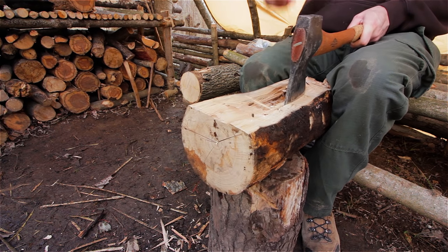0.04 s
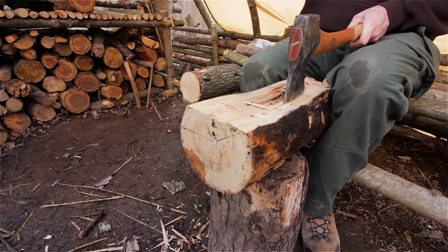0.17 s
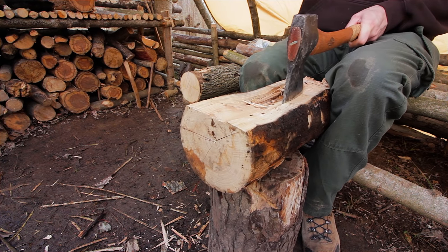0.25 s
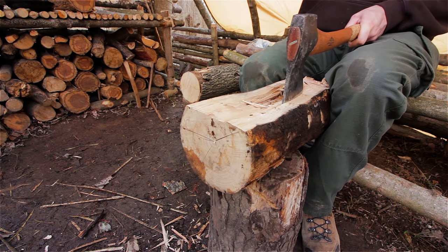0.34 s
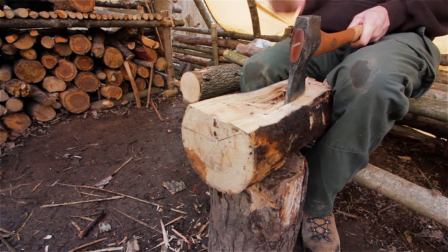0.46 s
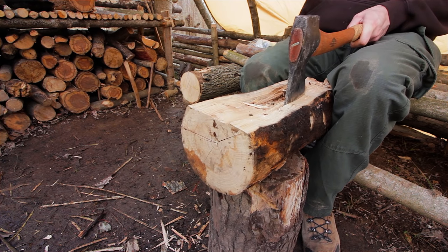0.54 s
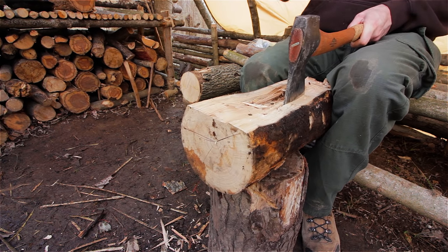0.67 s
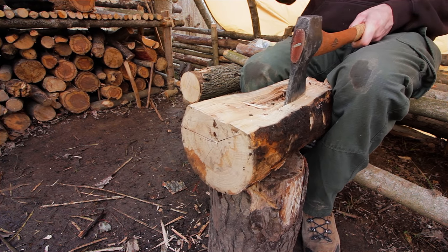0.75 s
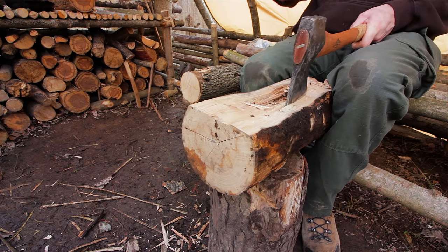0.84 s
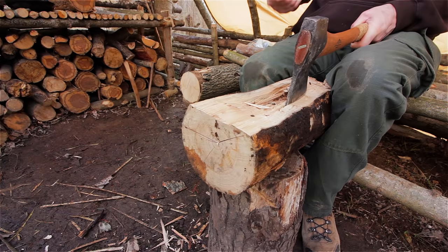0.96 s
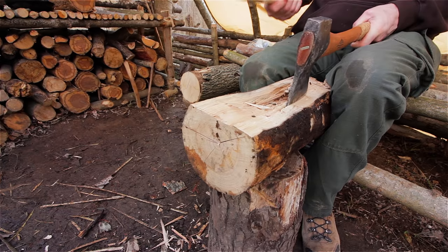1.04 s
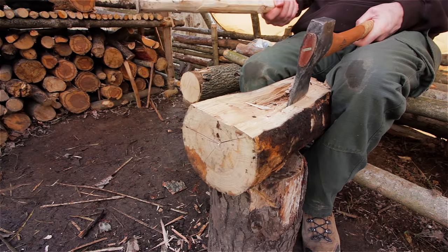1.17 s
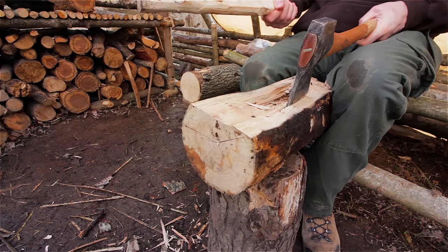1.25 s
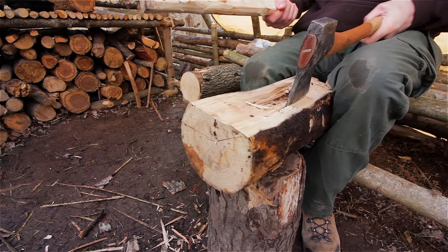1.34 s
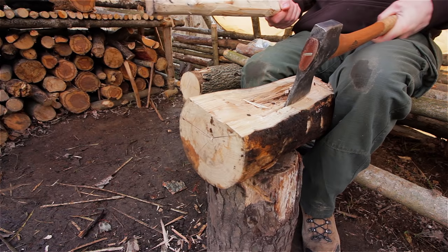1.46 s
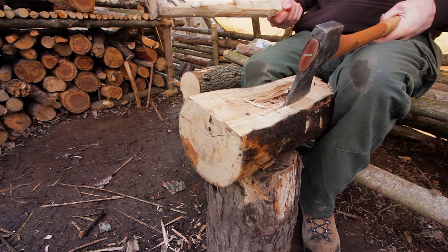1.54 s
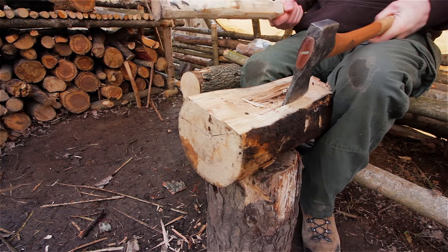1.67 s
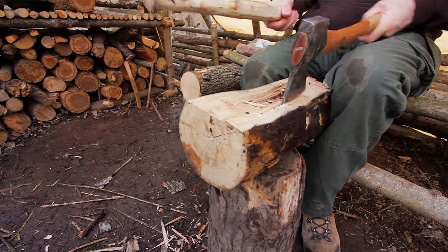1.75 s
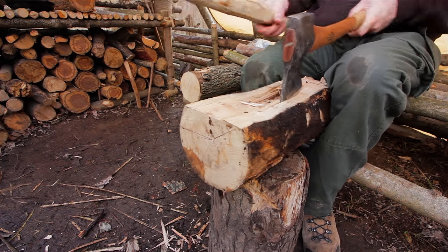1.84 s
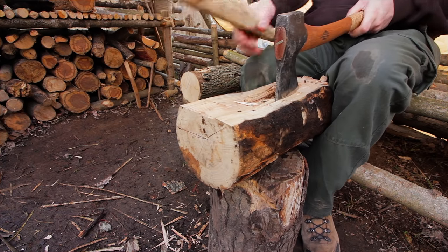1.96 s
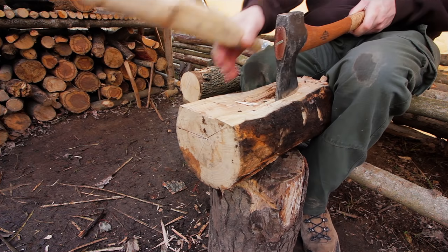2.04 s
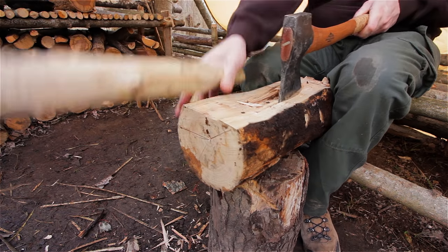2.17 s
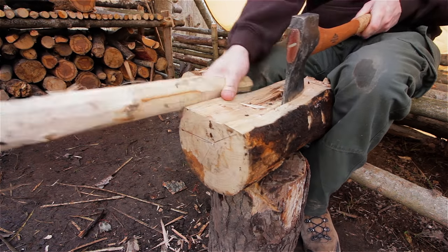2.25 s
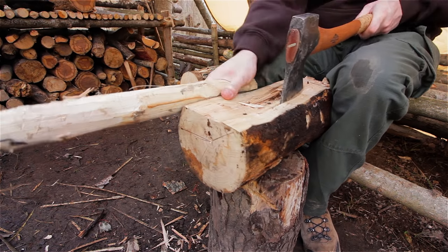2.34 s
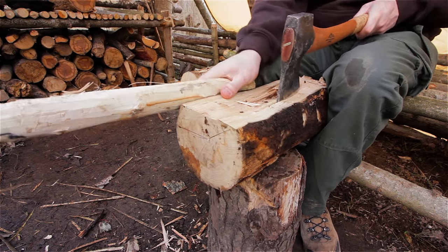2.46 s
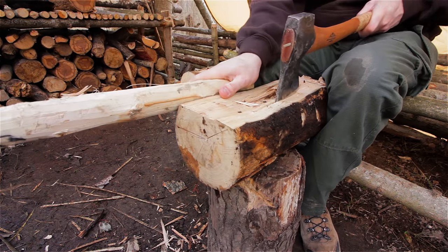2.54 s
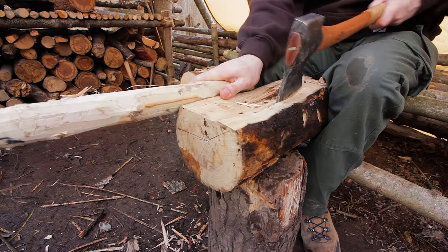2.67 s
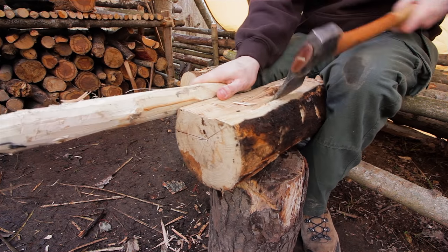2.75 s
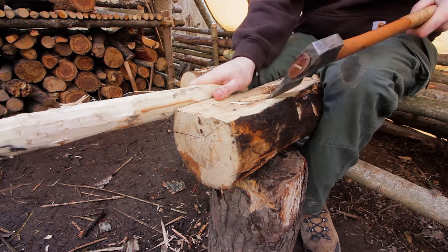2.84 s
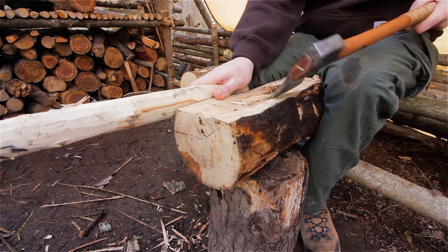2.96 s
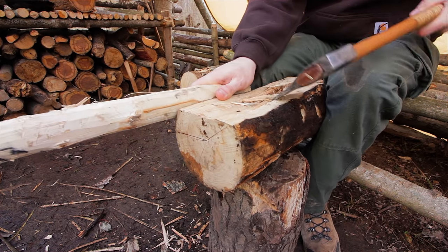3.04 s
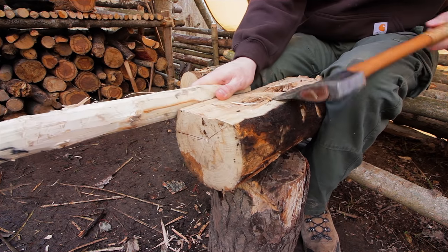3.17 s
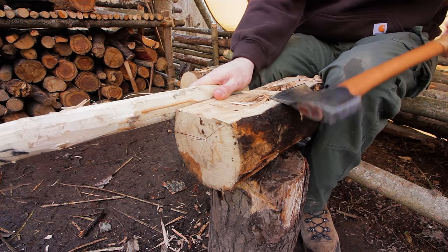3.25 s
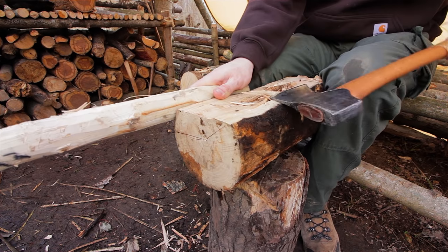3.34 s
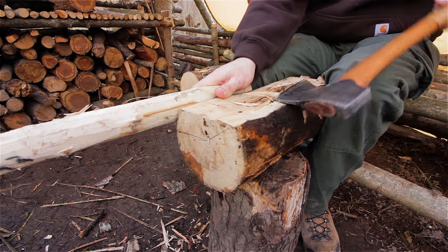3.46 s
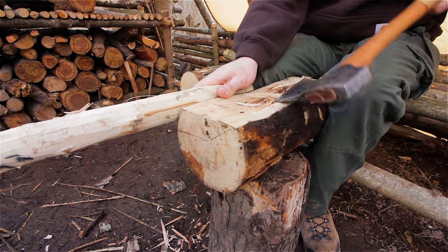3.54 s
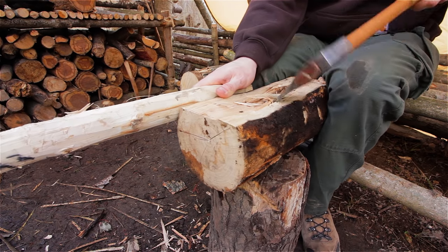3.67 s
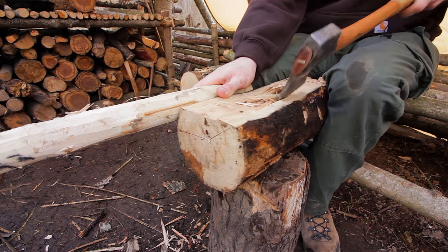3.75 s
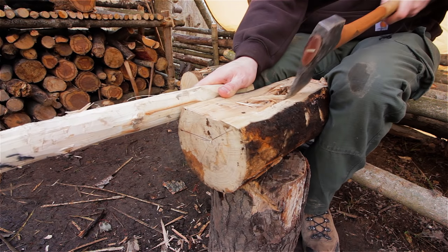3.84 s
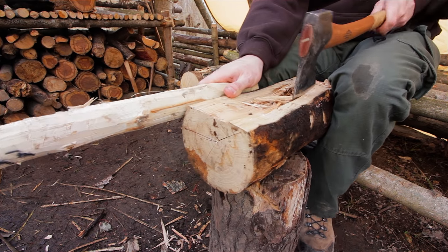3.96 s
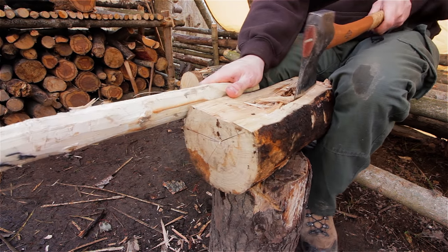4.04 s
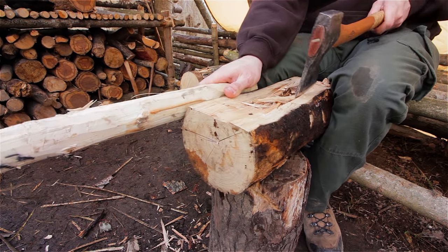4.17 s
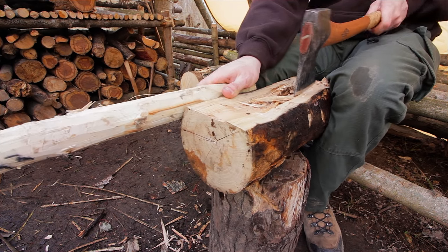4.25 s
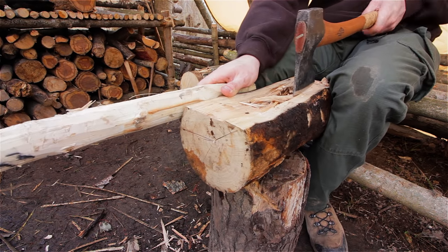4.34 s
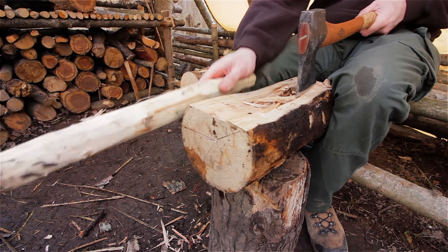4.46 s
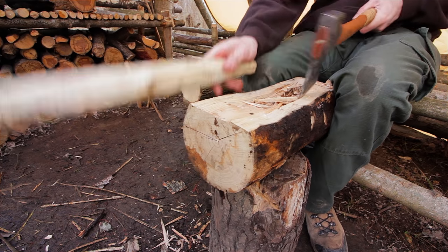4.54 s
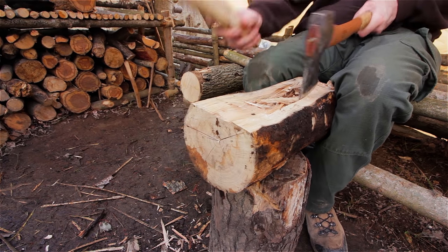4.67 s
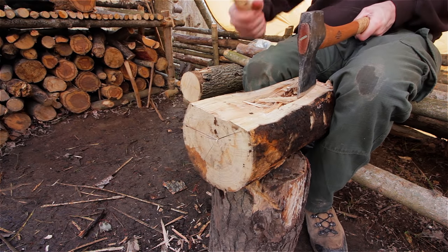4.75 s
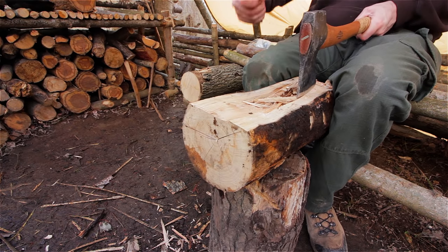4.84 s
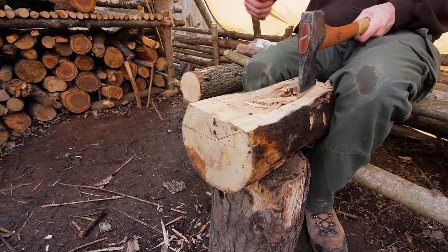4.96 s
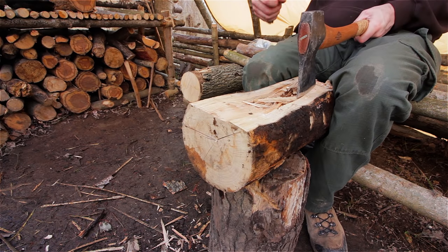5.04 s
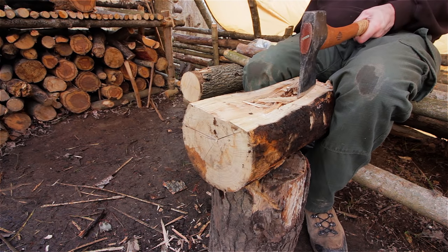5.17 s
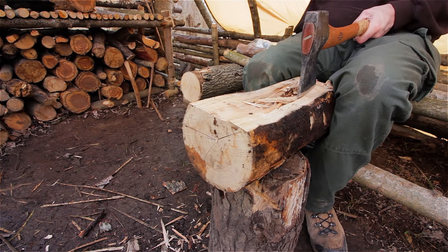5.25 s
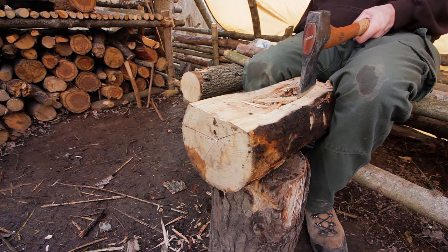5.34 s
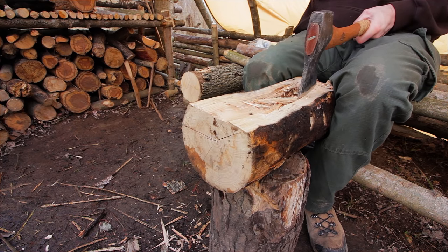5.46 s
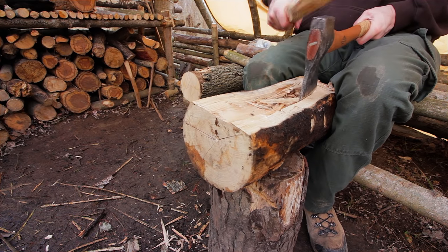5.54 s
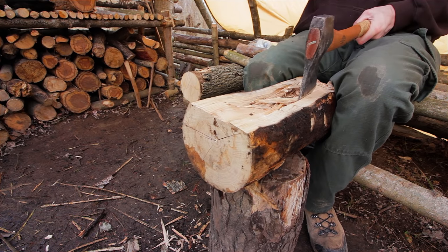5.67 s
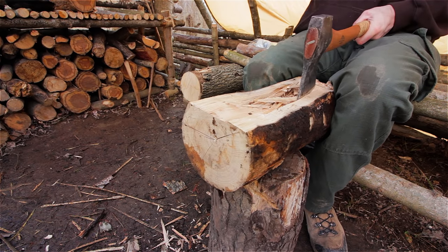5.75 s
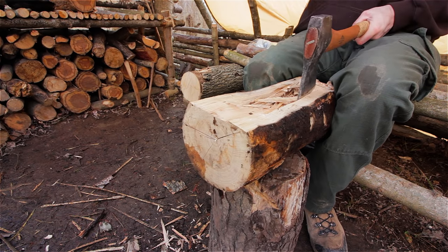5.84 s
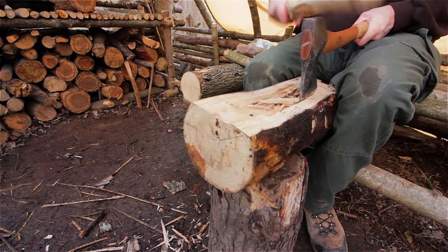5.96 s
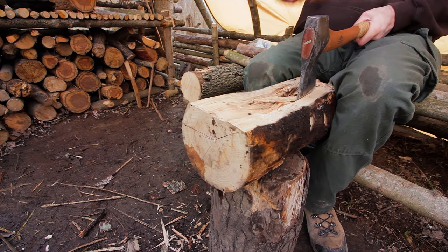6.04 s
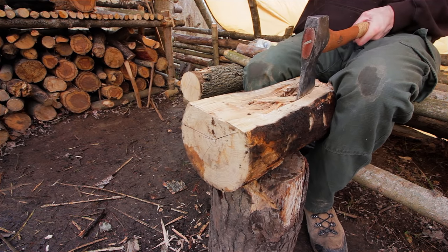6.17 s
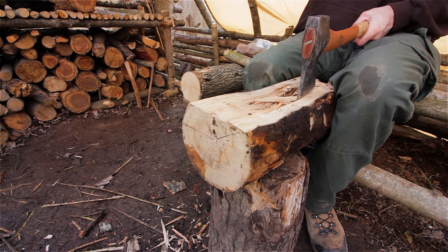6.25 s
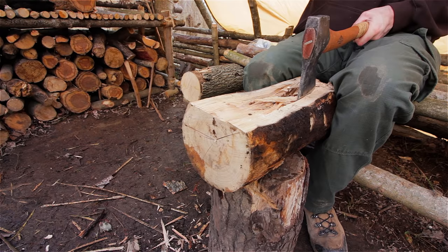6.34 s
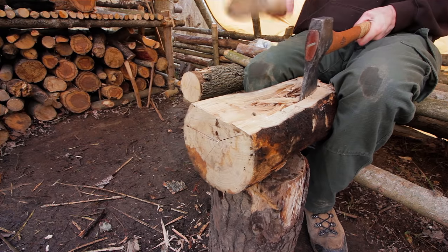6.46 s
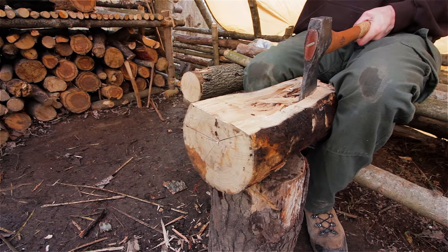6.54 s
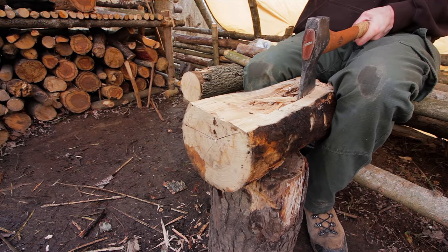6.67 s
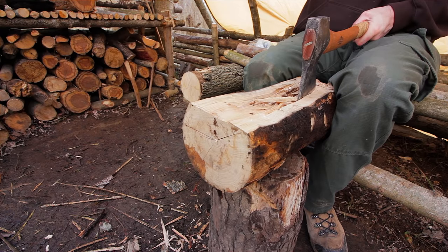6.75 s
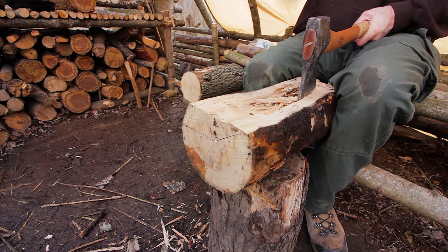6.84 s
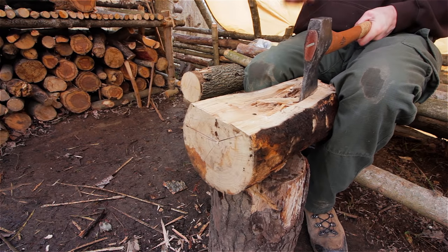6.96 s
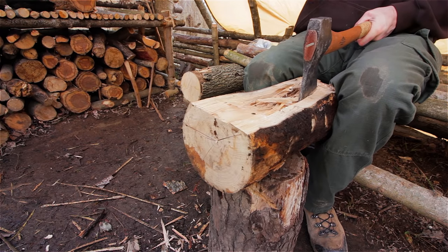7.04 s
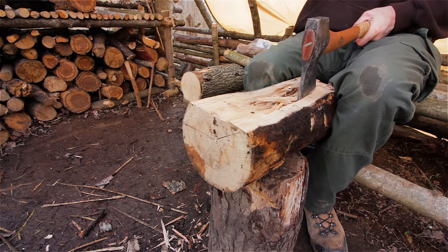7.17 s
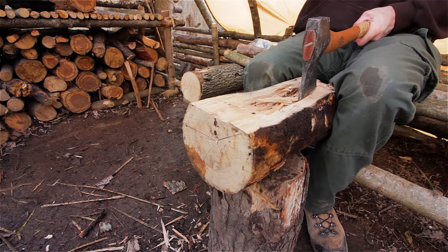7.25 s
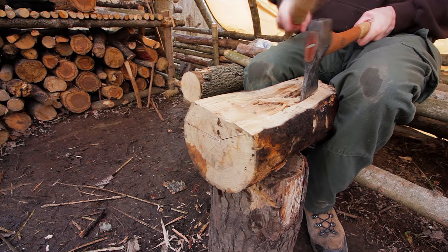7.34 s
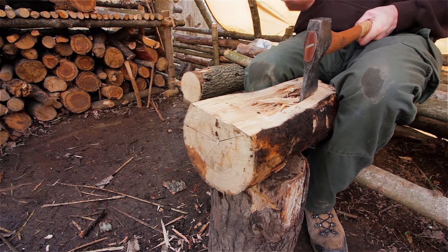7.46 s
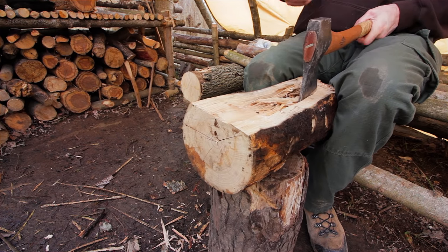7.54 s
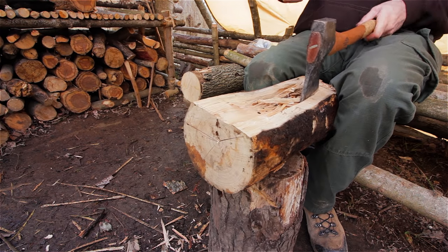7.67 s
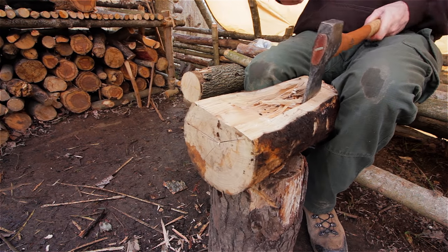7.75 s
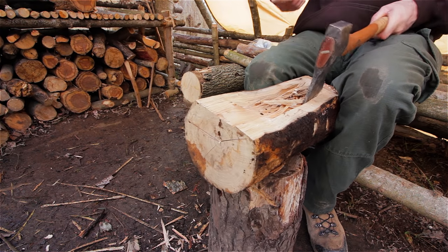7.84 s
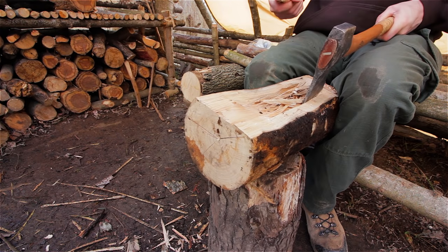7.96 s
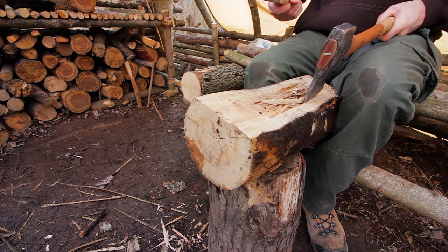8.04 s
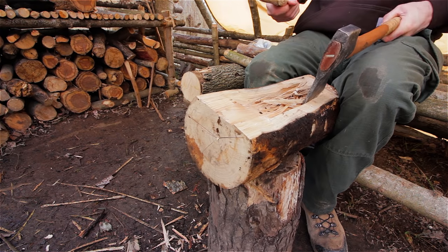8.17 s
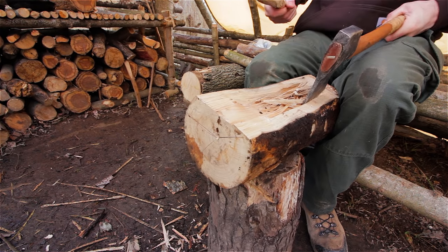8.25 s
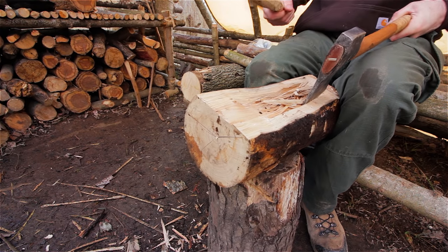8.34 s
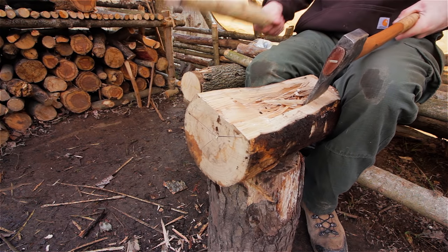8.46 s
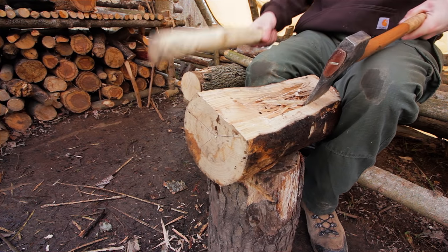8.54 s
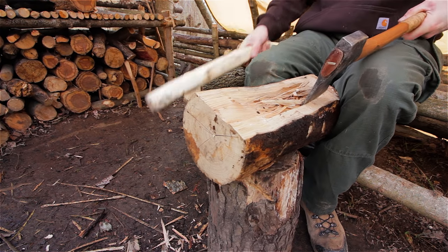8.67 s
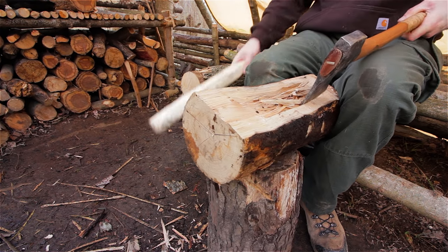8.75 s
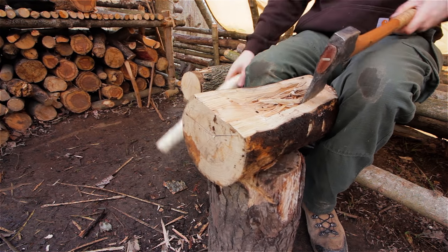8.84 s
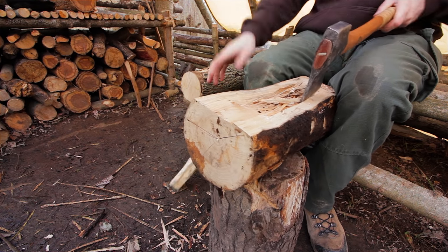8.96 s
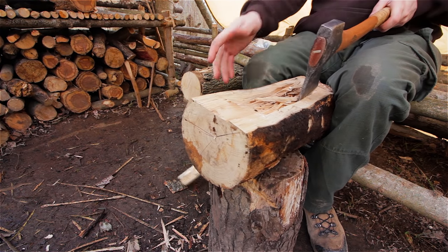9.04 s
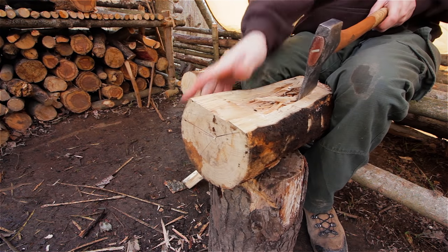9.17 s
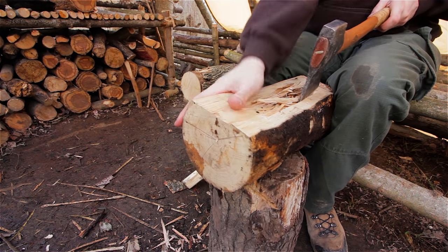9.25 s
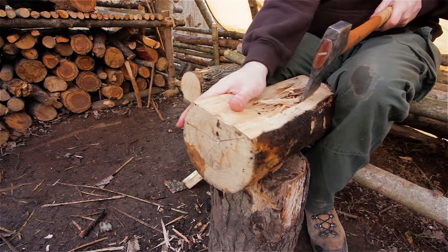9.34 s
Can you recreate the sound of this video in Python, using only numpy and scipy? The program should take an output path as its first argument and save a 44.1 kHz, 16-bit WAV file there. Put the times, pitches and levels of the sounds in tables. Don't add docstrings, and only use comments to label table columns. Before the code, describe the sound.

A wooden club hammers an axe head into a log with hard ringing knocks echoing among trees, between splinter cracks, rustling cloth and a dropped club.

```python
import sys
import numpy as np
from scipy import signal
from scipy.io import wavfile

SR = 44100
rng = np.random.default_rng(int(sys.argv[2]) if len(sys.argv) > 2 else 0)


def ratio(d):
    e = np.asarray(d, float) / 20
    return 10 ** e


def digitize_waveform(pressure):
    field = np.atleast_2d(pressure).T
    bounded = np.clip(field, -1, 1)
    quanta = np.round(bounded * 32767).astype(np.int16)
    wavfile.write(sys.argv[1], SR, quanta)


N = 414540
TIME_S = np.arange(N) / SR

# t/s, peak level/dB, crack level/dB, tilt/(dB per octave), decay factor
BLOWS = [
    (0.0505, -8.5, -6, 1.74, 1.1),
    (0.472, -10, -5.5, -.5, 1.2),
    (5.605, -8, 5.5, 0.7, 0.74),
    (6.0401, -7.5, 0.5, -1, 1.1),
    (6.4744, -7.5, 2, -1.3, 1.02),
    (6.9509, -3.5, -5, -0.5, 1.1),
    (7.4056, -6.5, 0, -0.14, 1.1),
]
# f/Hz, t60/s
CRACK_COLOUR = [(20, -39.5), (60, -38), (130, -28), (230, -15), (384, -9.5), (560, -3), (866, -10.5),
                (1200, -12.5), (1960, -8), (2480, -11), (3400, -7), (4200, -25), (6500, -20), (16000, -46)]
CRACK_T60 = [(40, .06), (150, 0.2), (400, 0.038), (1040, 0.13), (2760, 0.055), (7280, 0.027),
             (15000, 0.041)]
# f/Hz, width/Hz, level/dB
FIRST_CUT = [
    [(576, 17, -2.5), (800, 31, -10.5), (1048, 16, 0), (1115, 23, -3), (1240, 12, -4.5), (1290, 21, -8.5),
     (1534.5, 34, -4), (1943, 90, 3), (2174, 29, -0.5), (3000, 50, -16.5), (3150, 31, -22),
     (3350, 110, -13)],
    [(414, 61, -4.5), (555, 24, 2), (795, 36, -7), (1180, 30, -5), (1027, 25, 0), (1340, 21, -0.5),
     (1360, 16, -7), (1604, 76, 1.5), (2070, 19, -4.5), (2080, 36, -5), (2780, 44, -14.5),
     (3100, 39, -16.5), (3140, 20, -16), (3340, 61, -7.5)],
]
SECOND_CUT = [
    [(417, 24, -2.5), (270, 33, 0.5), (681, 30, -4), (780, 30, 1.5), (1190, 26, -4.5), (1350, 23, -6.5),
     (1610, 82, 1.5), (1950, 16, -5.5), (2080, 160, 1), (2300, 37, -0.5), (2490, 33, -6), (2800, 120, -8),
     (3050, 26, -7.5), (3270, 33, -7.5)],
    [(390, 49, -1), (570, 7.9, -0.5), (625, 20, -5.5), (806, 19, -2.5), (1090, 20, -4.5), (1184, 23, -2),
     (1285, 11, -4.5), (1580, 11, -5.5), (2100, 30, -4.5), (2300, 24, -5.5), (3100, 31, -13),
     (3420, 21, -8.5)],
    [(557, 21, 0.5), (784, 17, -3), (1005, 14, -3.5), (1195, 21, -0.5), (1600, 85, 0.5), (1905, 30, -5.5),
     (1320, 31, -6), (2140, 16, -9.5), (2350, 40, -14), (625, 43, -8.5), (2700, 41, -13), (3100, 120, -9.5),
     (3360, 29, -9.5)],
    [(426, 27, -4.5), (572, 38, 3), (1000, 26, -10), (1206, 68, -1.5), (1500, 26, -5.5), (1790, 25, -16.5),
     (2000, 86, -10), (640.7, 37, -3.5), (2600, 18, -15.5), (3200, 98, -18), (3130, 36, -14),
     (3640, 26, -21)],
    [(570, 46, -1.5), (638, 36, -7), (1090, 28, -3), (1027, 36, -2.5), (1276, 20, -6.5), (1640, 34, -3.5),
     (1664, 65, -4.5), (1920, 29, 2), (2330, 23, -11.5), (2720, 42, -14), (3150, 22, -16), (3290, 58, -11),
     (3660, 39, -15.5)],
]
BLOCK_DB = [-12, -10, -4, -9, -3, -12, -6.5]
STEEL_DB = [-56, -56, -54, -44, -52, -52, -52]
# f/Hz, level/(dB per Hz)
ECHO_COLOUR = [(150, -54), (300, -22), (540, -3.5), (900, -7.5), (1030, -2), (1500, -6.5), (1930, -3),
               (2500, -6.5), (3400, -5), (4200, -26), (8000, -46.5), (16000, -87.5)]
# f/Hz, t60/s
TREES_T60 = [(300, 1.1), (1000, 3.9), (2000, 30), (4000, 0.89), (8000, .5)]
SHELTER_T60 = [(200, 0.33), (1000, 1), (3000, 0.17), (5500, 0.18), (9000, .25)]
# level/dB, tilt/(dB per octave)
ROLL = [(0.5, -1.5), (-2, -1), (0, 2.8), (0, -1), (-0.5, 1.6), (2.5, -2), (0.5, 1)]
# f/Hz, level/dB, t60/s
LASTING = [(1124, -30.5, 0.05), (2140, -32, 0.029), (1950, -33, 0.014), (3550, -36, 0.026)]
# f/Hz, level/(dB per Hz); then f/Hz, t60/s
FIZZ_COLOUR = [(2500, -30), (4500, 0), (6500, -2.5), (10000, -12.5), (16000, -26)]
FIZZ_T60 = [(4000, 0.12), (7000, .12), (14000, .06)]

# t/s, peak level/dB, tilt/(dB per octave), decay factor
SNAPS = [(1.3004, -46, 0.5, 1.3), (1.8871, -34, 2, 0.86), (1.9046, -34.5, -0.5, 0.86),
         (2.2735, -36.5, 4, 1), (2.4239, -30.5, -3, 2.2), (2.445, -40.5, -1, .9), (2.7078, -18, -1.5, 1.5),
         (3.0704, -49.5, -5, 1.9), (3.0989, -47, -6.5, 1.9), (3.1254, -47, 4.5, 1.24),
         (3.2136, -34.5, 6, 1.6), (3.2274, -35.5, 0, 1.9), (3.2458, -31, 4.5, 0.547), (3.253, -11, 3, 1.19),
         (3.264, -1.5, 5, 3), (3.3296, -30, 2.5, 1.6), (3.3557, -16, 3.5, 1.02), (3.687, -32.5, -0.5, 0.85),
         (3.7449, -38.5, 0, 1.1), (3.9953, -26, -3.5, 1.1), (4.2667, -38, -2, 0.58), (4.356, -46, -7.5, 3),
         (4.5695, -39, -3.5, 1.4), (5.5257, -36.5, -5.5, 0.59), (5.648, -37, -6.5, 1),
         (5.9549, -33, -4.5, 0.46), (8.0354, -52, -4, 1.3), (8.0914, -49, -2.5, 0.48),
         (8.4644, -43, -8.5, 1.3)]
TEAR = [(2.745, -34.5, -4, 1.2), (2.7640, -21.5, -0.5, 1.4), (2.776, -20.5, 2.5, 0.94),
        (2.7900, -15, 1.4, 1.1), (2.7930, 7, 1.5, 1.6), (2.802, -.5, 0, 0.73), (2.8061, -8, 3, 0.97),
        (2.8104, -14.5, 0, 1.6), (2.8141, -8, -1.96, 0.89), (2.8310, -18, 0.5, 0.9), (2.8337, -14, 2, 0.65),
        (2.8385, -20.5, 0, 0.91), (2.844, -1.5, 3, 0.98), (2.891, -47, 1.5, 0.72),
        (2.9000, -44, -0.5, 0.71)]
# f/Hz, level/(dB per Hz)
SNAP_COLOUR = [(59, -44), (100, -29.5), (891, -18), (1720, -17), (3400, -1.5), (4770, -8.5), (6420, -1.5),
               (8110, -8), (9610, -7.5), (12100, -12.5), (16000, -25)]
# f/Hz, t60/s
SNAP_T60 = [(300, 0.021), (3000, 0.0023), (12000, 0.0025)]
SNAP_TAIL_T60 = [(300, 0.19), (3000, 0.025), (12000, 0.0089)]
# t/s, level/dB
CRACKLE = [(2.76, -49), (2.764, -38.5), (2.79, -42.5), (2.8, -29), (2.82, -32.5), (2.84, -37.5),
           (2.862, -37), (2.875, -66)]
# t/s, peak level/dB, f/Hz, t60/s
TWANGS = [(2.708, -26.5, 2700, 0.02), (2.708, -23.5, 3840, 0.019), (2.708, -23.5, 7200, 0.022),
          (2.764, -37, 3820, 0.033), (2.7746, -30.5, 7040, .015), (2.792, -9, 3740, 0.047),
          (2.793, -10.5, 6370, 0.017), (2.802, -13, 3300, 0.026), (2.811, -23, 3840, 0.021),
          (2.8131, -18, 3254, 0.031), (2.818, -26.5, 2900, .03), (2.834, -25.5, 3950, 0.02),
          (2.844, -16, 6844, 0.014), (3.253, -18.5, 3650, 0.023), (3.264, -18.5, 2450, 0.03),
          (3.265, -12.5, 6050, 0.017), (3.3296, -32.5, 4250, 0.015), (3.355, -28.5, 5600, 0.011),
          (3.745, -33.5, 3540, 0.011), (4.064, -40, 3000, .006), (4.065, -41, 6000, 0.0054),
          (4.788, -47, 1000, 0.054), (2.289, -15, 955, 0.037), (2.288, -12, 556, 0.035),
          (2.288, -22, 338, 0.053), (2.288, -30, 1930, 0.053), (2.289, -36, 2520, 0.037),
          (3.998, -31, 1400, 0.0093), (3.996, -28, 2200, 0.0063), (9.0541, -9.5, 1490, 0.023),
          (9.0544, -16.5, 1000, 0.026), (9.0554, -14.5, 1790, 0.027), (9.0554, -27, 630, 0.03),
          (9.0558, -19.5, 3130, 0.029), (9.058, -26, 58.5, 0.18), (9.0544, -20, 2510, 0.031),
          (3.995, -27, 5360, 0.011), (4.168, -37, 4500, .008), (4.28, -38, 3800, .008),
          (4.4305, -37, 5300, .008), (4.357, -42, 4000, .02), (4.103, -44, 4000, .006),
          (3.699, -45, 8500, .006), (9.337, -38, 1950, 0.079), (1.789, -39, 574, 0.061)]

# t/s, peak level/dB, tilt/(dB per octave), decay factor
KNOCKS = [
    (1.480, -29.5, 0, 0.65),
    (1.545, -36, 2, 1.7),
    (2.2875, -19, 2.5, 1.1),
    (9.0545, -9, 3, 0.8),
    (9.156, -10.5, 2.5, 0.87),
    (9.193, -19, -2.5, 0.65),
]
# f/Hz, t60/s
KNOCK_COLOUR = [(25, -26), (60, -7), (150, 2), (250, 1), (600, 6), (1000, -2), (1500, -8), (2500, -12),
                (4000, -18), (8000, -37.5), (16000, -37)]
KNOCK_T60 = [(40, 0.14), (150, 0.061), (400, 0.087), (3000, 0.076), (12000, 0.073)]
# t/s, peak level/dB, softness cut f/Hz, end that lands (0 head, 1 grip)
BOUNCES = [
    (9.1558, -1.5, 3230, 0.13),
    (9.164, -21, 1400, 0),
    (9.1904, -5, 1500, 0.63),
    (9.194, -3.5, 1960, 0.92),
    (9.242, -24, 3000, 0.63),
]
# f/Hz, level/dB struck at the head, level/dB struck at the grip, t60/s
CLUB = [(209.8, -3, -9.5, 0.244), (344, -14.5, -31, 0.3), (388, -9.5, -8, 0.24), (689, 1, 7.5, 0.068),
        (845, 1, -1.5, 0.056), (927, 3, 2.5, 0.21), (1054, 7.5, -7.5, 0.14), (1350, -20, -1.5, 0.047),
        (1535, -7.5, 2.5, 0.035), (1880, -8, -0.5, 0.08), (2200, 3.5, -17, 0.081), (2600, -18, -25, 0.037),
        (3190, -0.5, -16.5, 0.064), (4820, -3, -25, 0.06)]

# start t/s, fullest t/s, end t/s
RUB_S = [
    (3.12, 3.15, 3.23),
    (4.745, 4.785, 4.835),
    (5.04, 5.09, 5.13),
    (3.77, 3.875, 3.96),
    (4.7, 4.77, 4.85),
]
RUB_DB = [-45.5, -37.5, -51.5, -53, -49]
# f/Hz, level/dB, t60/s
PRISE = [(342, 3.5, 0.03), (1350, 3, .012), (2294, -0.5, 0.011), (3430, -4.5, 0.0098)]
GRIP = [(980, 2, 0.05), (1060, 8, 0.09), (1920, 1, 0.04), (2200, 5, 0.06), (3165, -6, 0.04),
        (3480, -7, 0.03), (4660, -10, 0.03)]
EDGE = [(4950, 0, .006), (7540, -12.5, .004), (2900, -8, 0.0056)]
# t/s, f/Hz of second partial, level/dB
SQUEAK = [(9.327, 1172, -53), (9.343, 1325, -47), (9.35, 1437, -34), (9.358, 1495, -35.5),
          (9.366, 1609, -42), (9.376, 1659, -33.5), (9.384, 1671, -36), (9.393, 1695, -32.5),
          (9.4, 1680, -35)]
# multiple, level/dB
SQUEAK_PARTS = [(.5, -13), (1, -1.5), (1.5, -21.5), (2, -29)]
SLIP_PAIRS_S = (9.352, 9.364)

# start t/s, fullest t/s, end t/s (silent from here on, so a row that ends before
# its start is never heard), level/dB, centre f/Hz
SWISHES = [(1.367, 1.532, 1.53, -51.5, 1500), (1.773, 1.782, 2.4, -56, 570),
           (1.798, 1.895, 2.2, -55.5, 2480), (2.336, 2.375, 2.5, -51, 2600),
           (2.518, 2.574, 2.59, -43, 2740), (2.638, 2.656, 3.02, -55, 2490),
           (2.998, 3.053, 6.9, -61.5, 2440), (3.775, 3.901, 4.04, -58.5, 4000),
           (4.16, 4.178, 4.21, -50.5, 4500), (4.333, 4.388, 4.6, -52.5, 2200),
           (4.422, 4.464, 4.48, -50, 4100), (4.521, 4.548, 4.64, -50.5, 3650),
           (4.705, 4.823, 4.85, -45, 3700), (5.152, 5.2, 4.5, -52.5, 4500), (8.283, 8.32, 7.5, -52, 2480),
           (8.428, 8.45, 8.5, -61, 3000), (8.59, 8.66, 8.685, -50.5, 1810),
           (8.737, 8.755, 8.8, -56.5, 3500), (8.872, 8.953, 8.985, -52.5, 4060),
           (9.294, 9.339, 9.36, -51, 3990)]
# t/s, level/dB
BUSY = [(0, -54.5), (.5, -56.5), (1.1, -55.5), (1.45, -48), (1.75, -52), (2.0, -51.5), (2.5, -50),
        (2.9, -60.5), (3.1, -56.5), (3.3, -54.5), (4.0, -48.5), (4.5, -49.5), (5.4, -54.5), (6.3, -51),
        (7.3, -52.5), (7.9, -52.5), (8.4, -50), (9.4, -52)]
# t/s, level/dB
DRONE = [(0, -50), (1.4, -50), (2.1, -45.5), (2.6, -46.5), (3.4, -45), (4.3, -45), (5.3, -48.5),
         (8.3, -47.5), (9.4, -48.5)]
# f/Hz, level/(dB per Hz)
RUSTLE_LOW = [(150, -33.5), (250, -11.5), (801, -4.5), (961, -10.5), (1020, -1), (1180, -6), (2200, -11.5),
              (2860, -36), (4840, -120)]
RUSTLE_HIGH = [(940, -26), (1600, -3.5), (2160, 2.5), (2800, 1), (3190, 1.5), (3810, -4.5), (10000, -16.5),
               (13000, -45), (22000, -120)]
SWING = [(40, -6), (150, 0), (400, -9.5), (1000, -7.5), (3000, -13.5), (9000, -29.5)]
HUM = [(24, -17), (45, -11.5), (62, -3.5), (82, 3.5), (105, -8.5), (130, -6), (175, -2), (230, -14),
       (300, -14), (420, -18)]
HISS = [(1760, -28.5), (3000, 0.5), (4310, 2.5), (10800, -3.5), (15100, -2.5), (16000, -3), (16300, -21)]
# t/s, drop level/dB
OTHER_DUCKS = [
    (2.8, 10),
    (2.846, 12.5),
    (9.16, 1),
]

EDGES_HZ = 22 * 2 ** np.arange(0, 9.7, 1 / 3)
CENTRES_HZ = np.sqrt(EDGES_HZ[1:] * EDGES_HZ[:-1])
WHITE = rng.standard_normal((2, N))
BANDS = np.array([
    signal.sosfilt(signal.butter(2, EDGES_HZ[k:k + 2], "band", fs=SR, output="sos"), WHITE[k % 2])
    for k in range(len(CENTRES_HZ))])


def blows():
    times = np.transpose(BLOWS)[0]
    cracks = [(s, db + crack_db, tilt, decay) for s, db, crack_db, tilt, decay in BLOWS]
    crack = bursts(cracks, CRACK_COLOUR, CRACK_T60, 19.3, vary_db=4.0, pivot_hz=1199,
                   rise_s=0.00087, length_s=0.051, punch_db=14.0)
    thin = signal.butter(4, 300, "high", fs=SR, output="sos")
    direct = signal.sosfilt(thin, wood() + crack)
    wall_s, wall_db = 0.0078, -15.5
    slap = ratio(wall_db) * np.roll(direct, round(wall_s * SR))
    push = signal.lfilter(*signal.butter(2, 150, fs=SR), clicks(times, ratio(-20.0)))
    thump = ring(push, 48, t60=0.034)

    echoes = [(s, db - 5.5, tilt, 1) for s, (db, tilt) in zip(times, ROLL)]
    brighter = [(s, db, tilt + 4.6, 1) for s, db, tilt, _ in echoes]
    shelter = bursts(brighter, ECHO_COLOUR, SHELTER_T60, -24.5, vary_db=3.6, pivot_hz=1000,
                     rise_s=0.0049, length_s=0.38)
    trees = bursts(echoes, ECHO_COLOUR, TREES_T60, -36, vary_db=0.8, pivot_hz=1000,
                   rise_s=0.02, length_s=1.1)
    carried = sum(ratio(db) * ring(trees, hz, t60) for hz, db, t60 in LASTING)
    return direct + slap + thump + shelter + ratio(-6.5) * (trees + carried)


def wood():
    block_hz, block_width_hz = 392, 61
    wood_loss_hz, contact_hz = 38.2, 4000
    steel_hz, steel_t60_s = 6000, 0.12
    out, size = np.zeros(N + SR), SR // 4
    damped = drift(120)
    for blow, cut, block_db, steel_db in zip(BLOWS, FIRST_CUT + SECOND_CUT, BLOCK_DB, STEEL_DB):
        at = round(blow[0] * SR)
        here = slice(at, at + size)
        click = clicks([0], ratio(blow[1] + 10.0))[:size]
        push = signal.lfilter(*signal.butter(2, contact_hz, fs=SR), click)
        for hz, width_hz, db in [*cut, (block_hz, block_width_hz, block_db)]:
            t60 = np.log(1000) / np.pi / (width_hz + wood_loss_hz)
            out[here] += ratio(db) * ring(push, hz, t60)
        out[here] += ratio(steel_db) * ring(push, steel_hz, steel_t60_s) * damped[here]
    return out[:N]


def settling():
    events = [(s, db, 0, decay) for s, db, _, _, decay in BLOWS]
    return bursts(events, FIZZ_COLOUR, FIZZ_T60, -23.0, vary_db=2.5, pivot_hz=5000,
                  rise_s=0.004, length_s=0.25)


def splinters():
    snaps = sorted(list(SNAPS) + list(TEAR))
    snap = bursts(snaps, SNAP_COLOUR, SNAP_T60, 10.0, vary_db=-1.5, pivot_hz=5130,
                  rise_s=0.0001, length_s=0.05, punch_db=1.5)
    tail = bursts(snaps, SNAP_COLOUR, SNAP_TAIL_T60, -7.5, vary_db=1.5, pivot_hz=4067,
                  rise_s=0.00074, length_s=0.1)
    crackle = (band_gains(SNAP_COLOUR) @ BANDS) * ratio(1.3 * drift(150)) * stroke(CRACKLE)
    twang = sum(ring(clicks([s], ratio(db)), hz, t60) for s, db, hz, t60 in TWANGS)
    return snap + tail + crackle + twang


def knocks():
    return bursts(KNOCKS, KNOCK_COLOUR, KNOCK_T60, 6, vary_db=6.0, pivot_hz=1040,
                  rise_s=0.0018, length_s=0.33, punch_db=4.5)


def club():
    out = np.zeros(N)
    spread = rng.standard_normal((len(BOUNCES), len(CLUB)))
    for (s, peak_db, cut_hz, end), chance in zip(BOUNCES, spread):
        at = round(s * SR)
        click = clicks([0], ratio(peak_db - 14.0))[:N - at]
        push = signal.lfilter(*signal.butter(2, cut_hz, fs=SR), click)
        for k, (hz, head_db, grip_db, t60) in enumerate(CLUB):
            mode_db = head_db + end * (grip_db - head_db) + 0.72 * chance[k]
            out[at:] += (-1) ** k * ratio(mode_db) * ring(push, hz, t60)
    return out


def friction():
    grit = rng.standard_normal(N) * ratio(2.7 * drift(53.64))
    out = np.zeros(N)
    for row, db, body in zip(RUB_S, RUB_DB, (PRISE, GRIP, GRIP[1:4:2], EDGE, GRIP[4:])):
        rubbed = sum(ratio(mode_db) * ring(grit, hz, t60) / np.sqrt(t60) for hz, mode_db, t60 in body)
        out += swell(*row, db) * rms_one(rubbed)
    return ratio(2.5) * out


def squeak():
    s, hz, db = np.transpose(SQUEAK)
    wobbly_hz = np.interp(TIME_S, s, hz) * (1 + 0.009 * drift(100))
    phase = 2 * np.pi * np.cumsum(wobbly_hz) / SR
    paired = np.interp(TIME_S, SLIP_PAIRS_S, [0, 1])
    stack = np.zeros(N)
    for multiple, part_db in SQUEAK_PARTS:
        fade_in = paired if multiple % 1 else 1
        stack += ratio(part_db + 2.5 * drift(66)) * fade_in * np.sin(multiple * phase)
    return stack * ratio(6.5 + np.interp(TIME_S, s, db, left=-200))


def background():
    step = slice(None, None, 40)
    t, gain = TIME_S[step], gain_db()[step]
    busy_db = np.interp(t, *np.transpose(BUSY))
    hum = ratio(np.interp(t, *np.transpose(DRONE)) + 0.94 * gain) ** 2
    hiss = ratio(-64 + 0.82 * gain) ** 2
    low = ratio(busy_db + 0.23 * gain) ** 2
    high = ratio(busy_db - 7 + gain) ** 2
    swing_s, swing_db = 0.061, -50.5
    swing = sum(swell(row[0] - swing_s, row[0], row[0] + 0.03, swing_db)[step] for row in BLOWS) ** 2
    brush = brushing(step)
    colours = [band_gains(c) ** 2 for c in (HUM, HISS, RUSTLE_LOW, RUSTLE_HIGH, SWING)]
    moving = np.clip(1 + gain / 24, 0.2, 1)
    together = drift(27.0)[step]
    grain = ratio(3.5 * drift(70)[step])
    out = np.zeros(N)
    for k, (c_hum, c_hiss, c_low, c_high, c_swing) in enumerate(zip(*colours)):
        flicker = ratio(4.8 * moving * (0.49 * together + drift(9.7)[step]))
        steady = ratio(-7.0) * c_hum * hum + ratio(11.5) * c_hiss * hiss + c_swing * swing
        rustle = ratio(-5.0) * c_low * low + ratio(-1.5) * c_high * high
        power = steady + flicker * rustle + ratio(8.0) * grain * brush[k]
        out += np.interp(TIME_S, t, np.sqrt(power)) * BANDS[k]
    return out


def brushing(step):
    span_octaves, fall_db = 1.4, 11.5
    power = 0
    for *shape, hz in SWISHES:
        away = np.log2(EDGES_HZ / hz) / span_octaves
        colour = list(zip(EDGES_HZ, -fall_db * (np.sqrt(1 + away ** 2) - 1) * 2))
        power = power + np.outer(band_gains(colour), swell(*shape)[step]) ** 2
    return power


def gain_db():
    blow_drop_db, hold_s, climb_db_per_s = 24, 0.26, 39
    drops = [(s, blow_drop_db) for s in (-hold_s, *np.transpose(BLOWS)[0])] + list(OTHER_DUCKS)
    curves = [np.interp(TIME_S, [s, s + 0.04, s + hold_s, s + hold_s + db / climb_db_per_s], [0, db, db, 0])
              for s, db in drops]
    return -np.max(curves, axis=0)


def bursts(events, spectrum, t60s, level_db, vary_db, pivot_hz, rise_s, length_s, punch_db=-40):
    out, size = np.zeros(N + SR * 2), int(length_s * SR)
    t, octaves = np.arange(size) / SR, np.log2(CENTRES_HZ / pivot_hz)
    rise = 1 - np.exp(-t / (rise_s + 0.36 / CENTRES_HZ[:, None]))
    punch = 1 + ratio(punch_db) * np.exp(-t / 0.0021)
    shape = rise * punch * np.cos(np.pi / 2 * t / length_s)
    for (s, peak_db, tilt_db, stretch), chance in zip(events, rng.random((len(events), 40))):
        uneven_db = vary_db * 1.9 * (chance[:len(octaves)] - 0.5)
        band_db = at_hz(spectrum, CENTRES_HZ) + tilt_db * octaves + uneven_db
        fade_db = -60 * t / (stretch * at_hz(t60s, CENTRES_HZ)[:, None])
        start = int(chance[-1] * (N - 2 * SR)) + SR // 2
        noise = BANDS[:, start:start + size] * shape * ratio(band_db[:, None] + fade_db)
        at = round(s * SR)
        out[at:at + size] += ratio(peak_db + level_db) * noise.sum(axis=0)
    return out[:N]


def ring(x, hz, t60):
    r, w = ratio(-60 / (t60 * SR)), 2 * np.pi * hz / SR
    return signal.lfilter([0, np.sin(w)], [1, -2 * r * np.cos(w), r * r], x)


def clicks(times, gains):
    out = np.full(N, 1e-18)
    np.add.at(out, np.round(np.asarray(times) * SR).astype(int), gains)
    return out


def swell(start, fullest, end, db):
    return ratio(db) * np.interp(TIME_S, [start, fullest, end], [0, 1, 0]) ** 0.94


def stroke(rows):
    return ratio(np.interp(TIME_S, *np.transpose(rows), left=-200, right=-200))


def drift(rate):
    r = np.exp(-80 * np.pi * rate / SR)
    slow = signal.lfilter([1], [1, -2 * r, r * r], rng.standard_normal(N // 40 + 2002))[2000:]
    return np.interp(np.arange(N) / 40, np.arange(len(slow)), rms_one(slow))


def band_gains(spectrum):
    inside = (CENTRES_HZ > spectrum[0][0]) * (CENTRES_HZ < spectrum[-1][0])
    gains = ratio(at_hz(spectrum, CENTRES_HZ)) * inside
    return gains / np.sqrt(np.sum(gains ** 2 * BANDS.var(axis=1)))


def at_hz(points, hz):
    table_hz, values = np.array(points)[:, :2].T
    return np.interp(np.log(hz), np.log(table_hz), values)


def rms_one(x):
    return x / np.sqrt(np.mean(x ** 2) + 1e-20)


def scene():
    chopping = blows() + settling() + splinters()
    handling = knocks() + club() + friction() + squeak()
    return (chopping + handling + background())[None]


def roll_off(x):
    return signal.sosfilt(signal.butter(12, 16470, fs=SR, output="sos"), x)


def record(dry):
    clipped = np.clip(dry, -1, 1)
    return roll_off(clipped)


dry = scene()
out = record(dry)
digitize_waveform(out)
```